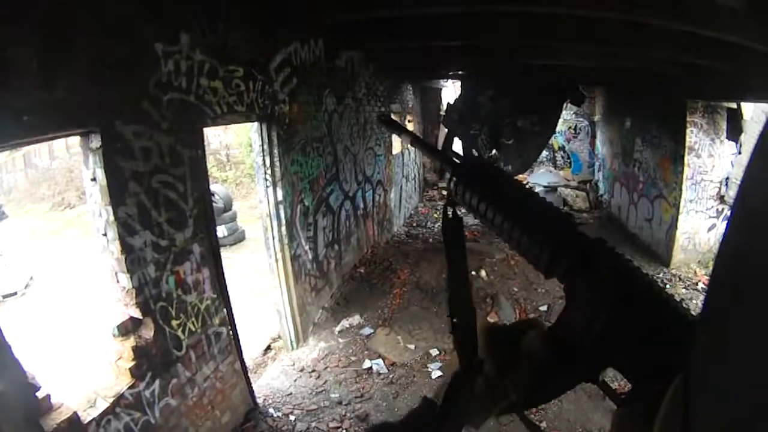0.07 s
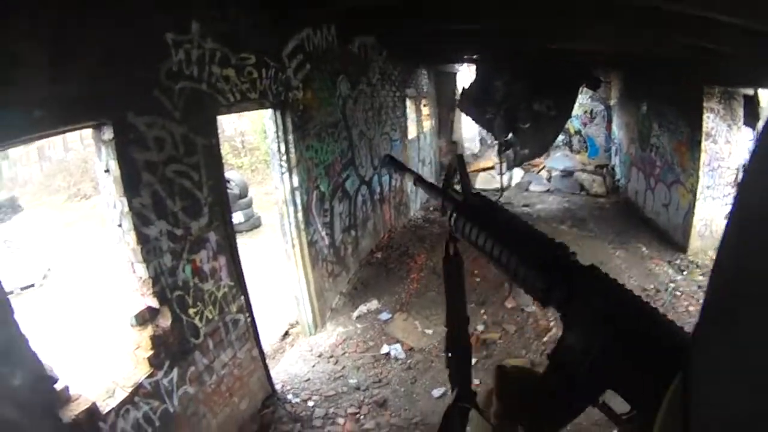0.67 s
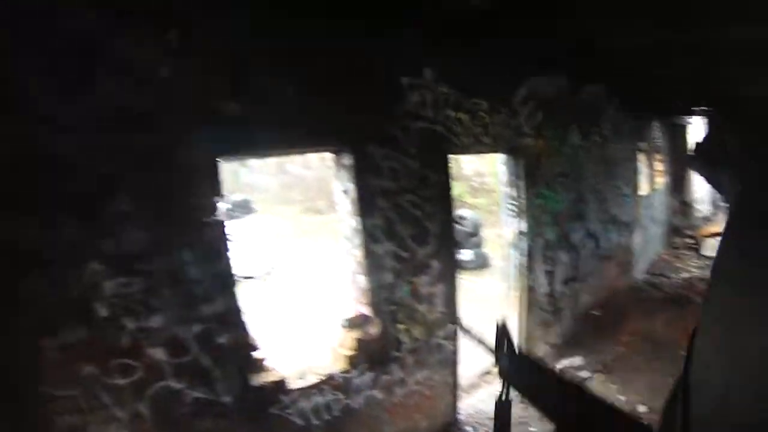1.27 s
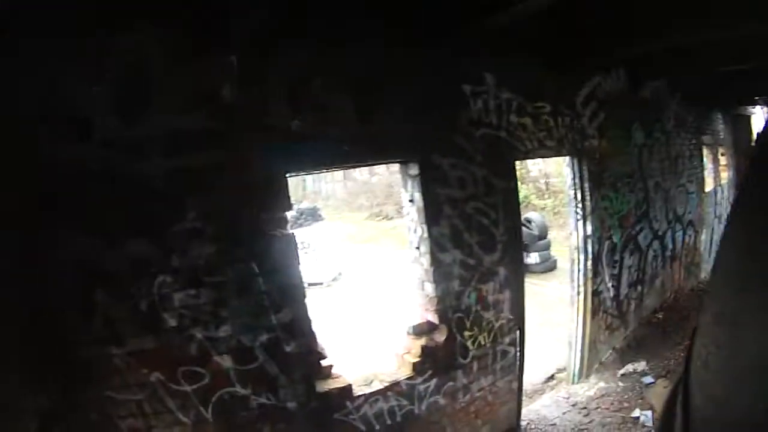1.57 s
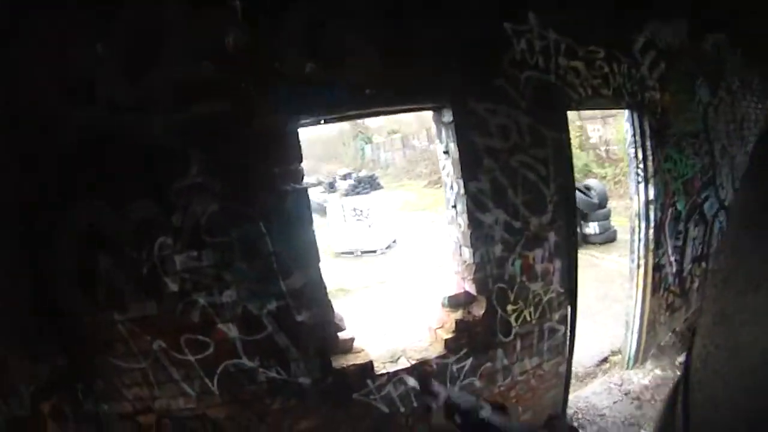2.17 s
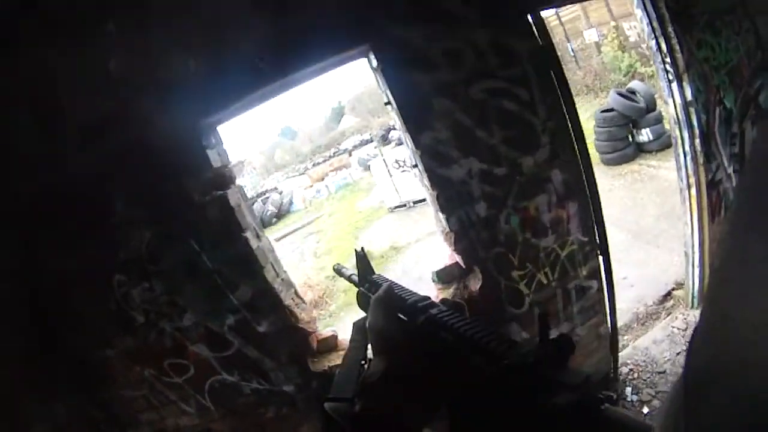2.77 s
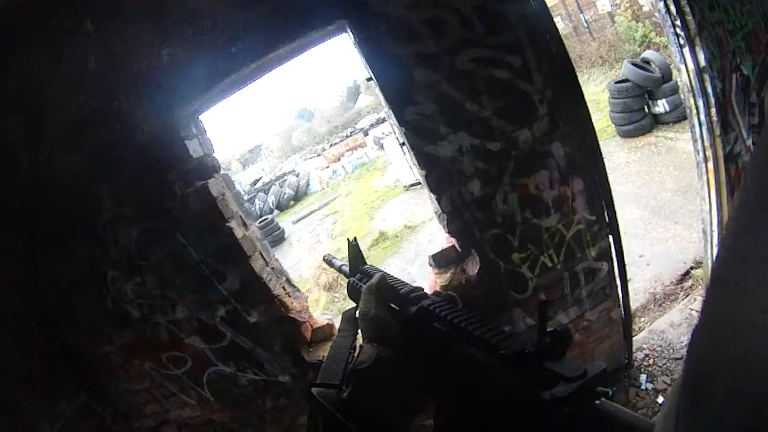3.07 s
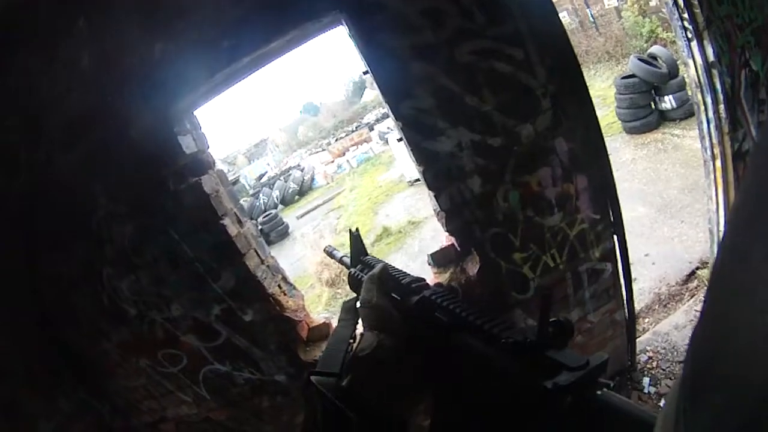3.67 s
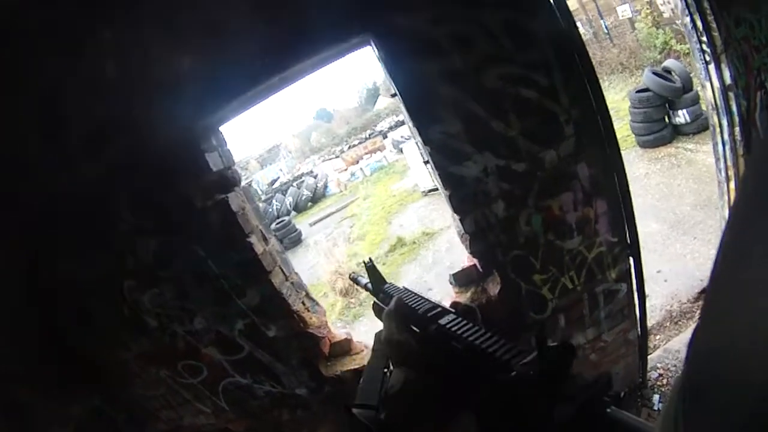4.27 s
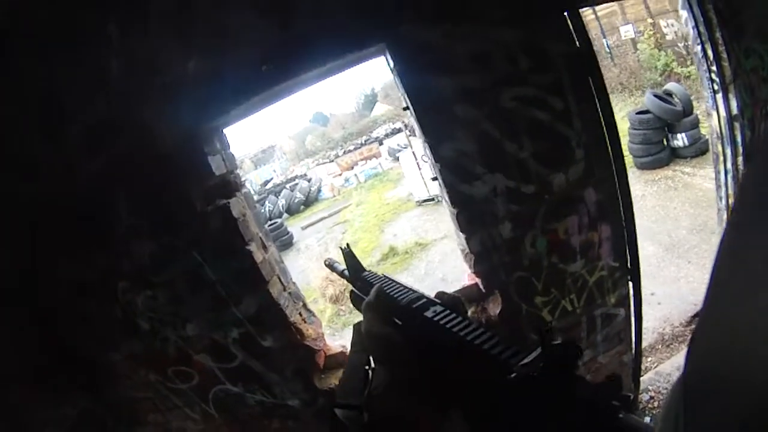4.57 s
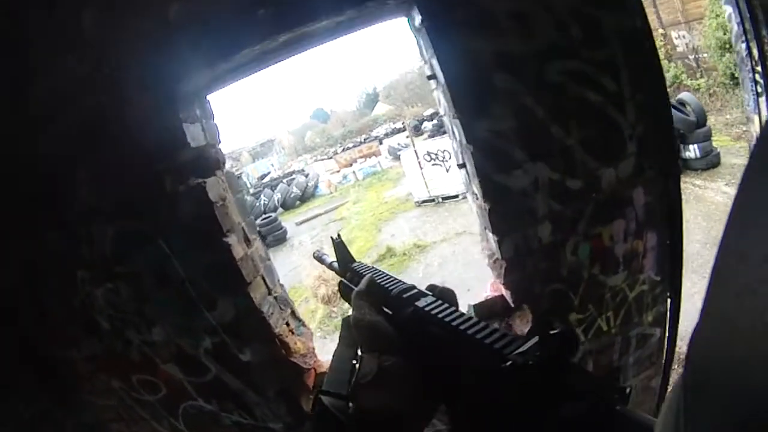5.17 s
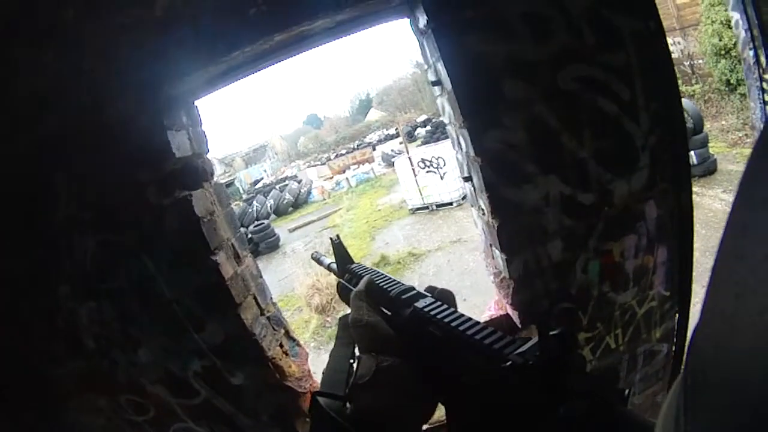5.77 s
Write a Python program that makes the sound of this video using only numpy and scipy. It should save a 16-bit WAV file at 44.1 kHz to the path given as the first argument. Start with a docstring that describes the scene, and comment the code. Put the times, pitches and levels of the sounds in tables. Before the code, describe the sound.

An airsoft rifle fires a long distant automatic burst, then a close one fires two short clacking bursts, echoing in a bare concrete room.

```python
"""Rapid clacks echo round a bare concrete room: electric airsoft rifles are firing on full auto.
A far rifle fires a long burst, heard mostly as echo; then a near one fires two short bursts.
For each shot, gears wind a spring with a rising whine, then a piston slips free and slams home.
Small knocks, clicks and a scuff fall in between, over a faint wash of noise from outdoors."""
import sys
import numpy as np
from scipy import signal
from scipy.fft import rfft, irfft
from scipy.io import wavfile
from scipy.ndimage import uniform_filter1d

SR = 44100
rng = np.random.default_rng(int(sys.argv[2]) if len(sys.argv) > 2 else 0)


def digitize_waveform(pressure):
    """Quantize a signal to 16-bit integers and store it at the path in sys.argv[1].

    Rows of a 2-D input are taken as channels; values are limited to [-1, 1].
    """
    field = np.atleast_2d(pressure).T
    bounded = np.clip(field, -1, 1)
    quanta = np.round(bounded * 32767).astype(np.int16)
    wavfile.write(sys.argv[1], SR, quanta)


N = 265993

# the dull tone of far-off noises and echoes: f/Hz, level/dB
DULL_TONE = [(100, -12), (300, 2), (600, 4), (1500, 0.5), (2400, -9), (3600, -28.5), (9000, -28.5),
             (15000, -34.5)]


def amp(db):
    """Turns decibels into a factor to multiply a sound by."""
    return 10 ** (np.asarray(db) / 20)


def unit_level(x):
    """Scales a sound to an average (rms) level of 1."""
    return x / np.sqrt(np.mean(x ** 2) + 1e-20)


def unit_energy(x):
    """Scales a short sound to the energy of 10 ms at level 1."""
    return x / np.sqrt(np.sum(x ** 2) / (.01 * SR) + 1e-20)


def look_up(points, hz):
    """Reads between the rows of a table, on a log-frequency axis."""
    f, value = np.transpose(points)
    return np.interp(np.log(hz + 1), np.log(f + 1), value)


def add(mix, s, sound):
    """Mixes a sound in at s seconds."""
    part = mix[max(round(s * SR), 0):][:len(sound)]
    part += sound[:len(part)]


def colour(x, tone, size=4096):
    """Filters a sound to the given tone, with no ringing ahead of it."""
    log_gain = np.log(amp(look_up(tone, abs(np.fft.fftfreq(size, 1 / SR)))))
    taps = np.fft.ifft(np.exp(np.conj(signal.hilbert(log_gain)))).real[:size // 2]
    return signal.fftconvolve(x, taps)[:len(x)]


def noise(tone, count):
    """Steady noise with the given tone."""
    return unit_level(colour(rng.standard_normal(count), tone))


def wobble(count, smooth):
    """A random wavering, smoothed over `smooth` samples."""
    return unit_level(uniform_filter1d(rng.standard_normal(count), size=smooth))


def flatten(x):
    """Makes all frequencies equally strong."""
    return irfft(np.exp(1j * np.angle(rfft(x))))


def blow(rise, hold, t60, size=4096, passes=8):
    """A spray of hard contacts swells, holds, then fades by 60 dB in t60 (all in seconds)."""
    t = np.arange(size) / SR
    shape = np.minimum((t + 1 / SR) / rise, 1) * amp(-60 * np.maximum(t - rise - hold, 0) / t60)
    x = shape * rng.standard_normal(size)
    for _ in range(passes):
        x = flatten(x) * shape ** (1 / passes)
    return unit_energy(x)


def hit(tone, **shape):
    """A blow that takes on the tone of the part it strikes."""
    return unit_energy(colour(blow(**shape), tone))


def ring(hz, t60, size=SR // 2):
    """One pure note that dies away."""
    t = np.arange(size) / SR
    return unit_energy(np.sin(2 * np.pi * hz * t) * amp(-60 * t / t60))


def outdoors(wash_db=-60, rise_s=0.023, fall_db_per_s=36, sag_hz_per_s=56, waver_hz=12):
    """A dull wash through the window, far-off noises that swell, and faint hums that sink in pitch."""
    # the steady wash: f/Hz, level/dB
    wash_tone = [(25, -3.5), (50, -4.5), (90, -3.5), (150, -1), (290, 3.5), (400, -1.5), (700, -9.5),
                 (1500, -8.5), (2400, -17), (3600, -21.5), (8000, -24.5), (15000, -29)]
    # far-off noises: t/s, level/dB
    swells = [(2.7, -44), (3.02, -51.5), (3.2, -52), (4.439, -53.5), (4.93, -51), (5.17, -54)]
    # low hums: t/s, length/s, starting f/Hz, level/dB
    hums = [(2.999, 0.28, 285, -57.5), (4.2, .46, 516, -62), (4.599, 0.44, 295, -61)]
    out = amp(wash_db) * noise(wash_tone, N)
    t = np.arange(SR) / SR
    for s, db in swells:
        shape = np.minimum(t / rise_s, 1) * amp(db - fall_db_per_s * t)
        add(out, s, shape * noise(DULL_TONE, len(t)))
    for s, length, hz, db in hums:
        pitch = hz - sag_hz_per_s * t + waver_hz * wobble(len(t), smooth=600)
        shape = amp(db) * np.sin(np.pi * np.minimum(t / length, 1) ** 2)
        add(out, s, shape * np.sqrt(2) * np.sin(2 * np.pi * np.cumsum(pitch) / SR))
    return out


def building_echo(x, level_db=-21, t60=1.63, rise_s=0.023):
    """The rooms beyond send back a long, faint, dull echo."""
    t = np.arange(2 * SR) / SR
    tail = noise(DULL_TONE, len(t)) * amp(-60 * t / t60) * np.minimum(t / rise_s, 1)
    return amp(level_db) * signal.fftconvolve(x, tail / np.linalg.norm(tail))[:N]


def room_echo(x, build_s=0.0087, step_s=.21, patterns=7, echoes_per_s=5000):
    """Dense echoes off bare walls; their pattern drifts as the listener moves."""
    # how long the echoes last: f/Hz, t60/s
    fade_times = [(120, 0.78), (500, 0.6), (1400, 0.51), (2800, 0.47), (7000, 0.37), (14000, 0.34)]
    # notes the room rings at (standing waves): f/Hz, level/dB, t60/s
    room_notes = [(127.5, -20, 0.24), (233.5, -26, 0.69), (299, -25, 0.12), (394, -24, 0.32),
                  (442, -26.5, 0.26), (497.6, -29, 1.8), (1323, -33, 1.2)]
    size, wet = SR * 3 // 4, np.zeros(N)
    ringing = sum(amp(db) * ring(hz, t60, size) for hz, db, t60 in room_notes)
    ringing /= np.linalg.norm(ring(room_notes[0][0], 1))
    for k in range(patterns):
        echoes = rng.choice([-1., 1.], size) * (rng.random(size) < echoes_per_s / SR)
        hz, t, bands = signal.stft(echoes, SR, nperseg=256)
        fade = amp(-60 * t / look_up(fade_times, hz)[:, None])
        tail = signal.istft(bands * fade, SR, nperseg=256)[1][:size]
        tail *= np.minimum(np.arange(size) / SR / build_s, 1)
        # each pattern fades into the next
        share = np.sin(np.pi / 2 * np.minimum((np.arange(N) / SR / step_s - k) % patterns, 2))
        wet += signal.fftconvolve(x * share, tail / np.linalg.norm(tail))[:N]
    return wet + signal.fftconvolve(x, ringing)[:N]


def scuff(rise_s=0.0063, sag_db_per_s=79, stop_t60=0.12, room_db=-12):
    """The shooter steps to the window: rubbing stirs two hollow notes, eases off and stops."""
    # the hollow notes: f/Hz, level/dB, t60/s
    notes = [(470, 0.5, 0.036), (615, -2, 0.029)]
    # the rubbing strokes: t/s, length/s, level/dB
    strokes = [(2.494, 0.13, -41.5), (2.598, 0.064, -31.5)]
    body = sum(amp(db) * ring(hz, t60) for hz, db, t60 in notes)
    t, level = np.arange(SR // 2) / SR, np.zeros(N)
    for s, length, db in strokes:
        fade_db = sag_db_per_s * t + 60 * np.maximum(t - length, 0) / stop_t60
        add(level, s, np.minimum(t / rise_s, 1) * amp(db - fade_db))
    rubbing = noise([(60, -19.0), (300, -8.5), (1500, 2), (5000, -2)], N)
    out = level * unit_level(signal.fftconvolve(rubbing, body)[:N])
    return out, amp(room_db) * out


def knocks(room_db=-4):
    """Each nearby knock is a short, loosely pitched body with a bright click on top; the row at 0.352 s is a
    bright echo, built the same way."""
    # the knocks, and one bright echo at 0.352 s: t/s, body level/dB, body f/Hz, t60/s, click level/dB
    events = [(0.0377, -29.5, 1170, 0.06, -41), (0.2228, -34, 960, 0.072, -36),
              (0.2926, -31, 1290, 0.032, -31.5), (0.3, -21, 824, 0.024, -40),
              (0.3179, -19, 1150, 0.0011, -26.5), (0.3238, -37, 1310, 0.033, -50),
              (.352, -27, 1600, 0.056, -31.5), (2.654, -38, 905, 0.053, -62),
              (2.663, -35.5, 1410, .03, -55), (3.2825, -38, 1100, 0.032, -68),
              (4.2363, -52, 736, 0.022, -53.5), (4.6469, -75, 1390, 0.023, -69),
              (4.828, -53.5, 236, .03, -80.5), (4.946, -55, 1400, 0.2, -65), (5.35, -53.5, 1870, 0.21, -82),
              (5.4196, -44.5, 1590, 0.03, -63)]
    # the bright click: f/Hz, level/dB
    click_tone = [(500, -21), (2500, 10.5), (3400, 2.5), (4600, 8.5), (6000, 2), (8200, 11.5),
                  (11000, -0.5), (15000, -13)]
    out = np.zeros(N)
    for s, db, hz, t60, click_db in events:
        body_tone = [(hz / 10, -42), (hz / 2, -13), (hz, 0),
                     (hz * 1.35, -6), (hz * 3, -30), (hz * 10, -55)]
        add(out, s, amp(db) * hit(body_tone, rise=0.00024, hold=0.00025, t60=t60, size=8192))
        add(out, s, amp(click_db) * hit(click_tone, rise=0.00073, hold=0.00071, t60=t60))
    return out, amp(room_db) * out


def far_clack():
    """The first faint arrival is overtaken by stronger ones off the nearby walls."""
    return 0.44 * blow(rise=0.00045, hold=.008, t60=0.03) + blow(rise=.012, hold=0.0049, t60=0.0449)


def far_rifle(direct_db=-3.5, knock_db=-1, knock_hz=760, knock_delay_s=0.0035, knock_s=0.024,
              facing_s=1.54, turn_db_per_s=16, fresh=0.49):
    """A smeared clack for each shot; its hollow knock is loudest as the listener turns to face it."""
    # the long burst: t/s, level/dB
    shots = [(0, -36), (0.0952, -19.5), (.324, -20.5), (0.5204, -20), (0.7179, -20), (0.899, -20),
             (1.0783, -20.5), (1.2517, -20), (1.4392, -20.5), (1.61, -21), (1.7767, -20), (1.9445, -20.5),
             (2.1173, -20.5), (2.2815, -20.5)]
    # the far clack: f/Hz, level/dB
    clack_tone = [(40, -37), (80, -35), (125, -17), (250, -8.5), (550, -5), (950, -1.5), (1150, 1.5),
                  (1550, 3.5), (1850, -5), (2300, -4), (3500, -17.5), (4900, -20), (6800, -12.5),
                  (8500, -18), (10500, -24), (15000, -32.5)]
    direct, to_room = np.zeros((2, N))
    t = np.arange(0, knock_s, 1 / SR)
    knock = unit_energy(np.sin(2 * np.pi * knock_hz * t) * np.hanning(len(t)))  # barrel air rings
    clack = far_clack()
    for s, db in shots:
        clack = unit_energy(clack + fresh * far_clack())  # the sound's paths change a little
        add(direct, s, amp(db + direct_db) * unit_energy(colour(clack, clack_tone)))
        turned_away_db = turn_db_per_s * abs(s - facing_s)
        add(direct, s + knock_delay_s, amp(db + knock_db - turned_away_db) * knock)
        add(to_room, s, amp(db) * unit_energy(colour(far_clack(), clack_tone)))
    return direct, to_room


# one shot: the motor winds the spring, the piston flies, the gears run on after the slam
WIND_S, FLIGHT_S, FREE_S = .055, .0155, 0.053


def motor(t, start_hz=724.5, top_hz=2007, engage_s=0.0018, unload_s=0.0075,
          brake_hz_per_s=15000, brake_db_per_s=597.5):
    """Pitch and loudness climb as the motor winds and drop as it brakes; the slam is at t = 0."""
    # level/dB at the start, fully wound and running free
    whine_db, rattle_db, hiss_db = (-39.5, -23.5, -47), (-31, -25, -30.5), (-60.5, -39, -42)
    running_s = t + FLIGHT_S + WIND_S
    wound = np.sin(np.pi / 2 * np.clip(running_s / WIND_S, 0, 1))
    free = np.clip((t + FLIGHT_S) / unload_s, 0, 1)
    braking_s = np.maximum(t - FREE_S, 0)
    tooth_hz = start_hz + (top_hz - start_hz) * wound - brake_hz_per_s * braking_s
    gate = np.clip(running_s / engage_s, 0, 1) * amp(-brake_db_per_s * braking_s)
    gains = [gate * amp((1 - free) * (start_db + (wound_db - start_db) * wound) + free * free_db)
             for start_db, wound_db, free_db in (whine_db, rattle_db, hiss_db)]
    return tooth_hz, tooth_hz / top_hz, *gains


def gearbox(slow_ratio=.31, slow_db=-5, flutter=0.008, speed_spread=.02,
            rasp_db=-14, slide_db=-19, chatter_db=3):
    """Meshing teeth whine over the rattle of the gears and the scrape of the spring."""
    # ringing of the spring and gears: f/Hz, level/dB, t60/s
    metal_notes = [(4610, -2.5, .012), (5370, -1, 0.0066), (5850, -17, .008), (7170, -5, .005)]
    # the rattling gears: f/Hz, level/dB
    gear_tone = [(50, -35), (140, -12), (380, -20.5), (600, 3.5), (850, -5.5), (1150, 6.5), (1450, -4.5),
                 (2100, 2.5), (2700, -8), (3600, -21.5), (15000, -57)]
    # the scraping hiss: f/Hz, level/dB
    hiss_tone = [(1500, -41), (3600, -4), (4500, -0.5), (6200, 2.5), (8000, 4), (10500, 0.5), (15000, -15)]
    t = np.arange(-FLIGHT_S - WIND_S, 2 * FREE_S, 1 / SR)
    tooth_hz, pace, whine_gain, rattle_gain, hiss_gain = motor(t)
    waver, chatter = wobble(len(t), smooth=150), wobble(len(t), smooth=150)
    speed = 1 + speed_spread * rng.standard_normal() + flutter * waver  # no two shots run alike
    angle = 2 * np.pi * np.cumsum(tooth_hz * speed) / SR
    slow_gear = amp(slow_db) * pace ** 2 * np.sin(slow_ratio * angle)  # it sings only at speed
    whine = np.sqrt(2) * (np.sin(angle) + slow_gear)
    # each tooth of the slow gear scrapes once, unevenly
    scrapes = (1 + np.cos(slow_ratio * angle)) * amp(chatter_db * chatter)
    metal = sum(amp(db) * ring(hz, t60, size=2048) for hz, db, t60 in metal_notes)
    rasp = unit_level(signal.fftconvolve(scrapes * rng.standard_normal(len(t)), metal)[:len(t)])
    rattle = noise(gear_tone, len(t))
    hiss = unit_level(scrapes * noise(hiss_tone, len(t)))
    slide = amp(slide_db) * np.maximum(1 - abs(t) / FLIGHT_S, 0)  # the piston rubs, most as it lands
    return t[0], (whine_gain * whine + (rattle_gain + slide) * rattle
                  + rattle_gain * amp(rasp_db) * rasp + hiss_gain * hiss)


def piston(rebound_db=-1, fade_s=.008):
    """The piston lands hard, then its head chatters for a few milliseconds."""
    landing = blow(rise=0.0003, hold=0.00076, t60=0.002)
    chatter = amp(rebound_db) * blow(rise=0.0011, hold=0.00224, t60=0.0079)
    fade = np.exp(-np.arange(len(landing)) / (fade_s * SR))
    return unit_energy(flatten(landing + chatter) * fade)


def near_rifle(snap_db=-12, rattle_db=-9, pop_db=-9.0, spring_db=-33, spring_delay_s=.022,
               vary_db=-12, room_db=-7):
    """Gears wind, the piston snaps free and slams the cylinder's end; parts rattle, the spring buzzes."""
    # the two bursts: slam t/s, slam level/dB, gear level/dB
    shots = [(3.3605, -12.5, -3.5), (3.548, -13, -4.5), (3.7247, -13.5, -5), (3.9059, -13, -5),
             (4.082, -14, -6.5), (5.5002, -15.5, -6.5), (5.6791, -15, -7), (5.8578, -14.5, -5.5),
             (6.029, -15.5, -5.5)]
    # the piston slipping off its gear: f/Hz, level/dB
    snap_tone = [(60, -30), (130, -9.5), (230, -2), (430, 1), (750, -5.5), (3300, -31), (4500, -25),
                 (6000, -22), (7800, -10.5), (10000, -21.5), (15000, -40.5)]
    # the piston's slam: f/Hz, level/dB
    slam_tone = [(40, -39), (130, -24.5), (250, -10.5), (430, -1), (550, -7), (690, 9.5), (920, -2),
                 (1100, -3.5), (1350, 7), (1550, -3), (1900, 9), (2150, -4.5), (2600, -11.5), (3600, -28),
                 (8000, -24.5), (11000, -34), (15000, -46.5)]
    # the rattle and the muzzle's pop: f/Hz, level/dB
    rattle_tone = [(50, -40.5), (130, -14), (400, -2), (650, -1.5), (1100, 2), (1450, 4.5), (2000, -2.5),
                   (2600, -10.5), (3600, -23.5), (8000, -25), (15000, -41.5)]
    # the freed spring's buzz: f/Hz, level/dB
    spring_tone = [(2500, -27.5), (5000, -2.5), (8000, 5), (10500, 2.5), (12500, -14), (15000, -22)]
    works, thump, pop = np.zeros((3, N))
    shell = amp(-22) * ring(hz=1345, t60=.08, size=4096)
    usual_slam = piston()
    for s, db, gear_db in shots:
        gear_offset_s, gears = gearbox()
        add(works, s + gear_offset_s, amp(gear_db) * gears)
        slam = colour(usual_slam + amp(vary_db) * piston(), slam_tone)  # each differs a little
        add(thump, s, amp(db) * unit_energy(slam))
        snap = hit(snap_tone, rise=0.00072, hold=0.0013, t60=0.011)
        add(works, s - FLIGHT_S, amp(db + snap_db) * snap)
        rattle = hit(rattle_tone, rise=0.0038, hold=0.0051, t60=0.039)
        add(works, s, amp(db + rattle_db) * rattle + amp(db) * shell)
        buzz = hit(spring_tone, rise=0.015, hold=0.016, t60=0.098, size=8192)
        add(works, s + spring_delay_s, amp(gear_db + spring_db) * buzz)
        add(pop, s, amp(db + pop_db) * hit(rattle_tone, rise=.001, hold=0.0018, t60=0.013))
    shaded = colour(works, [(2000, -5), (6000, -8.5), (12000, -8.0)])  # the shooter blocks some treble
    # the stock's boxy thump is heard only close by; the muzzle's pop fills the room
    return works + thump, pop + amp(room_db) * shaded


def scene():
    """Each indoor source gives its direct sound and what it sends into the room to echo."""
    direct, to_room = np.sum([far_rifle(), near_rifle(), knocks(), scuff()], axis=0)
    return (direct + room_echo(to_room) + building_echo(to_room) + outdoors())[None]


def record(dry, cutoff_hz=15400):
    """The loudest peaks clip, then the highest treble is cut off."""
    lowpass = signal.firwin(511, cutoff_hz, window=("kaiser", 9), fs=SR)
    return signal.oaconvolve(np.clip(dry, -1, 1), lowpass[None], "same")


dry = scene()
out = record(dry)
digitize_waveform(out)
```